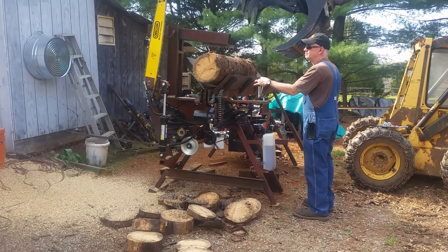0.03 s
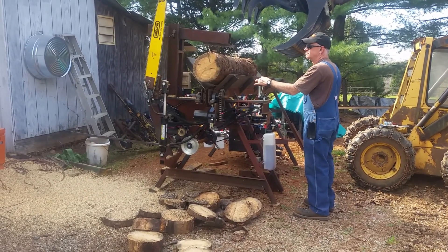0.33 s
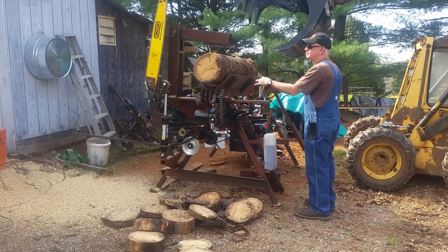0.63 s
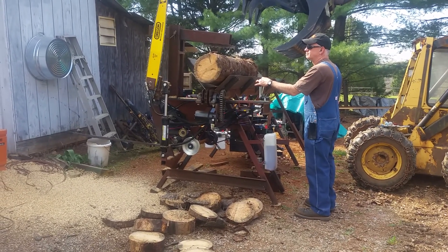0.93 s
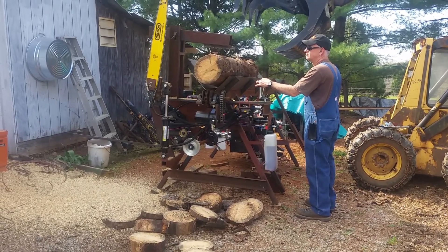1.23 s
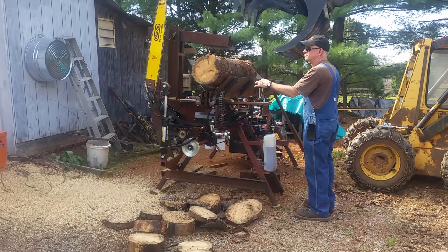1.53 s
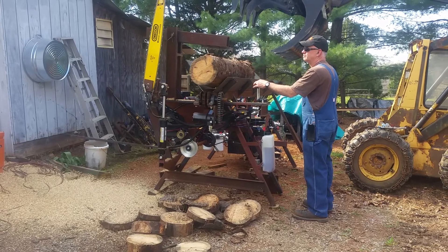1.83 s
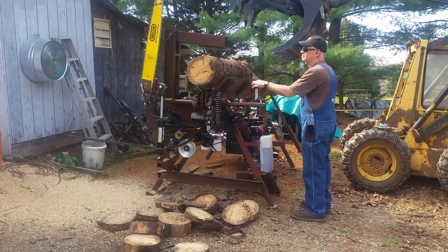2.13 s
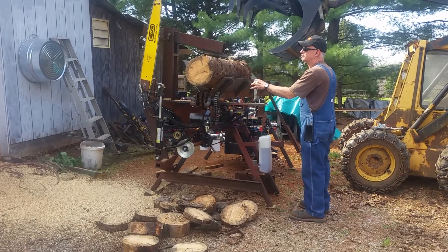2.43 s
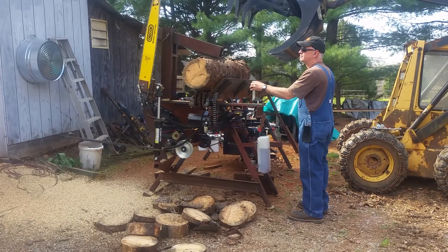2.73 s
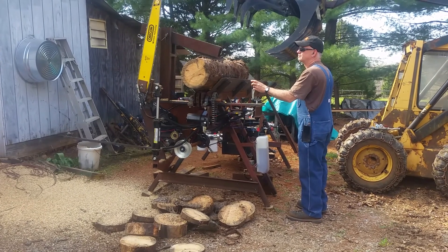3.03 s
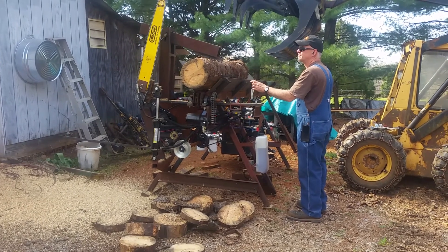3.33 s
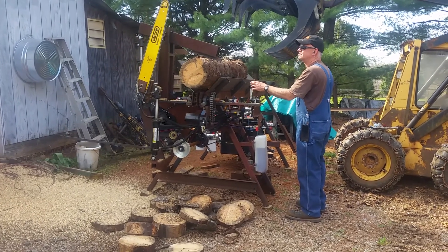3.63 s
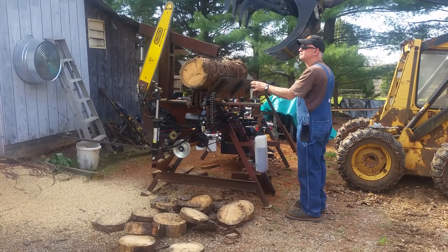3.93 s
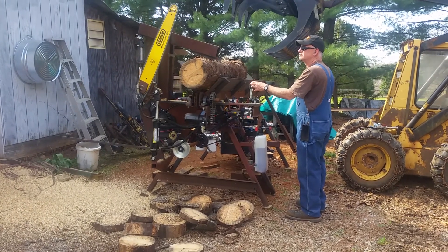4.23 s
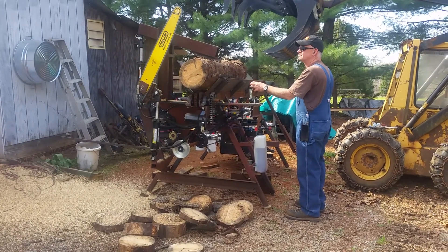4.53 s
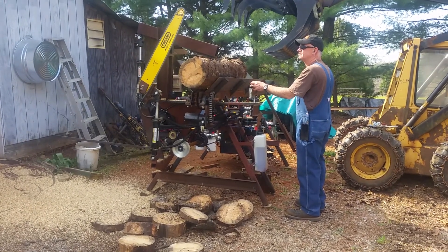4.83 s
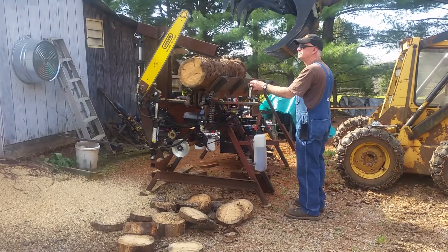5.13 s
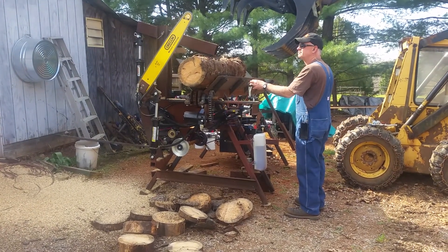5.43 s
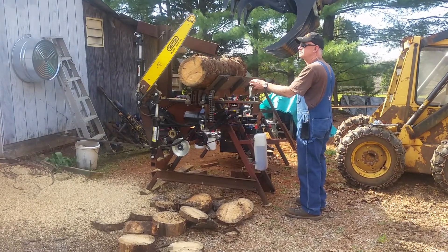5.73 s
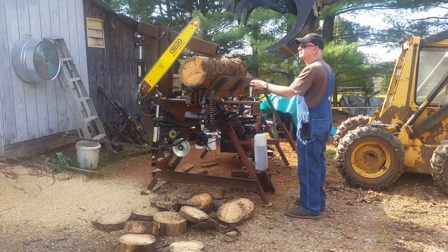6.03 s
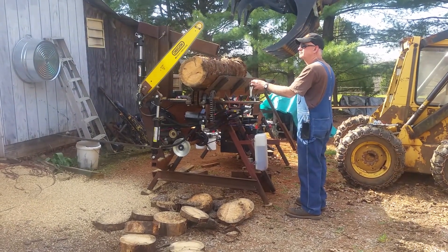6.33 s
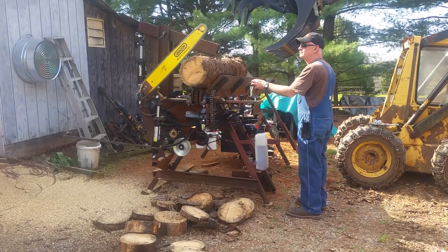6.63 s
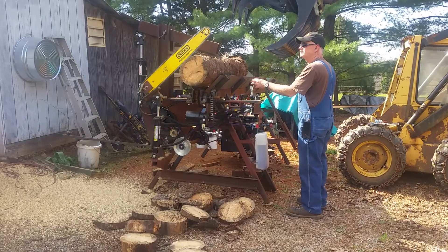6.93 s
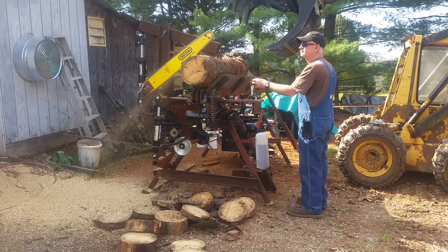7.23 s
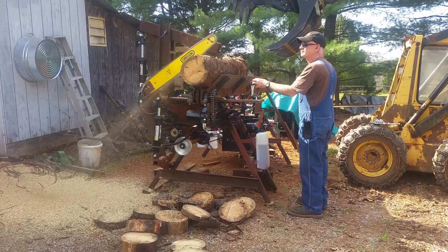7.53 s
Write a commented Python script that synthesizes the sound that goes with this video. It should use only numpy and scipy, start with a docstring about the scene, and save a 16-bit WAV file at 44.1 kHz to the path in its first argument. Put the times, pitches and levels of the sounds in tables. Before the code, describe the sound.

A petrol firewood processor runs loudly at full throttle in a yard, a few metres away. From the start its exhaust throbs fast and evenly under valve clatter, a rattling steel guard, gear and pump whine and hissing oil, while a faint ring of steel dies away. At about 2.5 seconds the log carriage scrapes briefly. From 3.1 seconds a hydraulic valve whistles and the pump gives a short straining tone. At 3.7 seconds the saw chain starts with a spurt of oil; the engine bogs, stumbles with a low boom and regains speed by about 4.6 seconds. The roar and whine are now quieter, and the chain's bright hiss takes over. Between 4.4 and 6.2 seconds the descending saw arm gives three faint, rasping squeals. From about 7.2 seconds the engine throb grows slightly as the teeth begin biting the log.

```python
"""A yard: a petrol firewood processor at full throttle, a few metres away.
Firings throb in the exhaust, valve gear clatters, gears, fan and hydraulic pump whine, oil hisses in
the valves. The steel frame rings out and the log carriage scrapes. The saw chain is switched in and
its arm swings down, squealing: the engine bogs, the governor catches it, and the chain's bright hiss
takes over until the teeth begin to bite."""
import sys
import numpy as np
from scipy.fft import rfft, irfft
from scipy.io import wavfile
from scipy.ndimage import uniform_filter1d

SR = 44100
rng = np.random.default_rng(int(sys.argv[2]) if len(sys.argv) > 2 else 0)


def log_audio(samples):
    """Write samples as a 16-bit WAV file to the path given in sys.argv[1]."""
    # one column per channel
    frames = np.atleast_2d(samples).T
    # limit to full scale, then quantise
    limited = np.clip(frames, -1, 1)
    pcm = np.round(limited * 32767).astype(np.int16)
    wavfile.write(sys.argv[1], SR, pcm)


N = 334278
TIME_S = np.arange(N) / SR
FREQ_HZ = np.maximum(np.arange(N // 2 + 1) * SR / N, 1)

# engine speed, with sag and governor recovery (time [s], crank rate [Hz])
CRANK_SPEED = [(0.0, 56.8), (0.08, 56.81), (3.0, 56.65), (3.17, 56.17), (3.31, 56.19), (3.71, 56.64),
               (3.76, 55.77), (3.88, 48.05), (4.2, 53.18), (4.58, 56.93), (4.71, 57.14), (5.13, 55.47),
               (5.83, 56.5), (6.36, 55.73), (6.63, 56.06), (6.99, 56.03), (7.41, 55), (7.58, 55.4)]
# exhaust partials, relative (order [x crank rate], free [dB], bogged [dB], driving the chain [dB])
EXHAUST_ORDERS = [(0.5, -37, -36, -36.0), (1.0, -17.5, -5, -17), (1.5, -17, -30, -46), (2.0, 2.5, 5.5, 2),
                  (2.5, -57, -13, -17), (3.0, -2, -14, -5.5), (3.5, -23, -14, -33), (4.0, -8.5, -5.5, -8),
                  (4.5, -34, -19, -25), (5.0, -17.5, -15, -18.5), (6.0, -22.5, -7.5, -22),
                  (6.5, -17, -34, -23.5), (7.0, -20.5, -21, -27), (7.5, -20, -24, -39),
                  (8.0, -36, -22, -23), (8.5, -17, -33, -21), (9.0, -20.5, -23, -23), (10.0, -24, -21, -21)]
# roar and hiss spectra, relative (frequency [Hz], left [dB], right [dB])
ROAR_FREE_SPECTRUM = [(35, -67.5, -68.8), (65, -62.7, -64.7), (115, -57.2, -58.3), (250, -57.7, -58.9),
                      (550, -58.0, -58.3), (660, -62.3, -62.7), (790, -57.1, -66.4), (970, -56.7, -60.1),
                      (1400, -57.7, -58.6), (1950, -60.4, -60.9), (2300, -57.8, -58.3),
                      (2530, -57.2, -57.4), (2750, -59.6, -59.1), (3000, -61.6, -59.2)]
ROAR_LOADED_SPECTRUM = [(35, -71.6, -72.8), (65, -66.1, -69.0), (115, -61.9, -65.0), (250, -64.2, -68.1),
                        (530, -63.9, -67.3), (630, -69.1, -69.5), (720, -68.6, -70.5), (800, -63.6, -73.1),
                        (970, -62.0, -66.1), (1400, -64.6, -67.3), (2000, -67.3, -67.2),
                        (2500, -63.0, -63.3), (2750, -64.2, -63.9), (3000, -65.3, -62.8)]
OIL_SPECTRUM = [(3425, -67, -52.5), (3790, -61, -60), (4640, -80, -58), (5320, -67.5, -57),
                (5670, -62, -64.5), (6420, -64.5, -62), (7510, -49, -67), (8030, -53.5, -85),
                (9140, -55, -66), (10540, -51.5, -66.5), (11940, -55, -61), (13500, -59.5, -65),
                (14300, -69, -74)]
CHAIN_SPECTRUM = [(3320, -68, -57), (3980, -61, -59.5), (4570, -86, -60), (5230, -69.5, -58.5),
                  (6080, -68.5, -67), (7120, -56, -69.5), (7720, -51, -66), (8900, -56.5, -75),
                  (9550, -55.5, -63), (10360, -50, -76), (11000, -47.5, -59), (12340, -49.5, -63),
                  (13100, -57, -63.5), (14300, -59.5, -62.5)]
# left-right likeness of roar and hiss (frequency [Hz], correlation [0-1])
STEREO_CORRELATION = [(120, 0.43), (500, 0.64), (780, 0.29), (1100, 0.13), (1500, 0.05), (2000, 0),
                      (2400, 0.73), (2900, 0), (4000, 0)]
# gear tones, relative (order [x crank rate], free [dB], loaded [dB], left minus right [dB])
GEAR_ORDERS = [(19.06, -13.5, -29, -1), (21.56, -25, -37, 0), (29.78, -14.5, -15, -2),
               (62.3, -16.5, -37, -2), (87.1, -23, -36, -6), (97, -17, -36, -12)]
# frame and oil-flow resonances (frequency [Hz], width [Hz], level [dB], left minus right [dB])
FRAME_MODES = [(2525, 22, -35, 0), (3140, 19, -37, -7), (3780, 21, -34, -6), (4650, 21, -37.5, -11),
               (4800, 2500, -29.5, -5)]
WHISTLE_MODES = [(2420, 150, -42, 1), (5050, 130, -42, -12), (8760, 80, -37, 8), (9340, 60, -43, 12),
                 (10450, 300, -33, 12)]
SPURT_MODES = [(4200, 2000, -33.5, -3), (7400, 400, -30, 17)]
# frame resonances under the carriage (frequency [Hz], width [Hz], level [dB])
CARRIAGE_MODES = [(440, 36, -29.5), (990, 110, -28), (1450, 550, -30), (2700, 680, -27)]
# uneven firings (centre time [s], length [s], frequency [Hz], level [dB])
UNEVEN_FIRINGS = [(3.835, 0.063, 212, -27), (3.937, 0.15, 146.4, -23), (6.224, 0.046, 82, -25)]
# saw arm squeals (start [s], end [s], pitch [Hz], level [dB])
SQUEALS = [(4.449, 4.852, 1710, -47), (4.867, 5.396, 1675, -43), (5.68, 6.201, 1687, -42)]
# squeal partials and rasp (multiple [x pitch], width [Hz], relative level [dB])
SQUEAL_MODES = [(2, 130, 2.5), (3, 100, -6), (3.6, 2500, 2)]

# layer gains (free [dB], change under load [dB], drift with chain on [dB/s], change at bite [dB])
EXHAUST_LEVEL = (-16.8, -9.5, -0.75, 3)
ENGINE_LEVEL = (-25.5, -5, -0.62, 2)
FAN_LEVEL = (-33.5, -13.5, -0.5, -7)
PUMP_LEVEL = (-35.5, -10, -1, -7)
HISS_LEVEL = (-22.5, 2.5, -0.49, 1)

LEVER_S, PUSH_S, PUSH_RISE_S, PUSH_LOAD = 2.54, 3.08, 0.12, 0.48  # swing valve opens, pump pushes arm
PUSH_EXHAUST_DB, PUSH_ENGINE_DB, PUSH_FAN_DB = -0.3, 0.55, -0.5
SAW_ON_S, SAW_RISE_S = 3.734, 0.13
BITE_S, BITE_RISE_S = 7.16, 0.4
GOVERNED_HZ, FULL_SAG_HZ = 55.6, 6.7
THROTTLE_DB_PER_HZ_PER_S, GOVERNOR_S, COAST_HZ_PER_S = 0.34, 0.11, 6


def undb(db):
    """Decibels to gain."""
    return 10 ** (np.asarray(db) / 20)


def pan(db):
    """Stereo gains for a left-minus-right level."""
    return undb(np.array([[db], [-db]]) / 2)


def ramp(start_s, length_s):
    """Linear rise, 0 to 1."""
    return np.clip((TIME_S - start_s) / length_s, 0, 1)


def swell(start_s, end_s):
    """Rounded rise and fall."""
    return np.sqrt(np.abs(np.sin(np.pi * ramp(start_s, end_s - start_s))))


def layer_gain(level, load):
    """Gain as the chain starts, runs and bites."""
    free_db, load_db, drift_db_per_s, bite_db = level
    running_s = np.maximum(TIME_S - SAW_ON_S, 0)
    bite = ramp(BITE_S, BITE_RISE_S)
    return undb(free_db + load_db * load + drift_db_per_s * running_s + bite_db * bite)


def wander(rate_hz):
    """Low-passed noise, rms 1."""
    x = irfft(rfft(rng.standard_normal(N)) * np.exp(-(FREQ_HZ / rate_hz) ** 2), N)
    return x / x.std()


def ring(hz, width_hz):
    """Resonance driven by friction or flow noise, rms 1."""
    x = irfft(rfft(rng.standard_normal(N)) / (1 + 1j * (FREQ_HZ - hz) / width_hz) ** 2, N)
    return x / x.std()


def resonances(modes):
    """Sum of panned resonances."""
    return sum(pan(pan_db) * undb(db) * ring(hz, width_hz) for hz, width_hz, db, pan_db in modes)


def over_freq(hz, values):
    """Interpolation on log frequency."""
    return np.interp(np.log(FREQ_HZ), np.log(hz), values)


def stereo_spectra(three_noises):
    """Left and right spectra from one shared and two separate noises."""
    shared, *own = rfft(three_noises)
    correlation = np.clip(over_freq(*np.transpose(STEREO_CORRELATION)), 0, 1)
    return np.sqrt(correlation) * shared + np.sqrt(1 - correlation) * np.array(own)


def colour(spectra, table, band_hz):
    """Stereo noise shaped by a table, steep skirts; mid signal has rms 1 in the band."""
    hz, *sides_db = np.transpose(table)
    skirts = 1 / np.sqrt((1 + (hz[0] / FREQ_HZ) ** 20) * (1 + (FREQ_HZ / (0.99 * hz[-1])) ** 20))
    shaped = spectra * skirts * undb([over_freq(hz, db) for db in sides_db])
    in_band = (FREQ_HZ > band_hz[0]) & (FREQ_HZ < band_hz[1])
    return irfft(shaped, N) / irfft(shaped.mean(0) * in_band, N).std()


def exhaust(turns, load, bog, smear_rad=0.298):
    """One puff a turn, alternate ones unlike; the pipe smears upper partials in time."""
    wave = 0
    for order, free_db, bogged_db, loaded_db in EXHAUST_ORDERS:
        db = (1 - bog) * (free_db + (loaded_db - free_db) * load) + bog * bogged_db
        wave = wave + undb(db) * np.sin(2 * np.pi * order * turns + smear_rad * (order - 3) ** 2)
    wave = wave / np.sqrt(uniform_filter1d(wave ** 2, size=6000))
    return wave * undb((-0.88 + 0.85 * load) * wander(29))  # no two firings burn alike


def throttle_db(crank_hz, bog):
    """Governor throttle: exhaust level follows crank acceleration, less so when bogged."""
    accel_hz_per_s = np.maximum(np.gradient(crank_hz) * SR, -COAST_HZ_PER_S)
    smoothed = uniform_filter1d(accel_hz_per_s, int(GOVERNOR_S * SR))
    return THROTTLE_DB_PER_HZ_PER_S * smoothed * (1 - bog) ** 2


def roar(turns, load, crossover_hz=700, band_hz=(400, 2800)):
    """Valve gear clatter, partly repeating every two turns, over fan noise and a gas gush per firing."""
    points = 1556
    cycles = rng.standard_normal((3, points))
    clatter = np.array([np.interp(turns / 2 * points, np.arange(points), c, period=points)
                        for c in cycles])
    repeat_share = 0.29 * (1 - 0.61 * load)
    metal = np.sqrt(repeat_share) * clatter + np.sqrt(1 - repeat_share) * rng.standard_normal((3, N))
    gas = rng.standard_normal((3, N)) * (1 + 0.34 * np.cos(2 * np.pi * turns))
    low_share = 1 / (1 + (FREQ_HZ / crossover_hz) ** 6)
    noises = irfft(np.sqrt(low_share) * rfft(gas) + np.sqrt(1 - low_share) * rfft(metal), N)
    spectra = stereo_spectra(noises)
    free = colour(spectra, ROAR_FREE_SPECTRUM, band_hz)
    loaded = colour(spectra, ROAR_LOADED_SPECTRUM, band_hz)
    return (1 - load) * free + load * loaded


def gear_whine(turns, load):
    """Gear teeth sing at crank orders, wavering in moving air."""
    out = 0
    for order, free_db, loaded_db, pan_db in GEAR_ORDERS:
        phase = 2 * np.pi * order * turns + (0.14 + 1.3 * load) * wander(7.7)
        db = free_db + (loaded_db - free_db) * load + 0.87 * wander(4.6)
        out = out + pan(pan_db) * undb(db) * np.sin(phase)
    return out


def guard_rattle(turns, load, hz=2480, width_hz=190, uneven_db=3.0):
    """A loose steel guard, shaken by the engine, chatters in uneven bursts."""
    shake = (1 + 0.12 * np.cos(2 * np.pi * turns)) * undb(uneven_db * wander(21))
    return undb(-13 - load) * ring(hz, width_hz) * shake / np.sqrt(np.mean(shake ** 2))


def fan(turns, load, push, blades=12):
    """Tone of blades passing their housing."""
    gain = layer_gain(FAN_LEVEL, load) * undb(PUSH_FAN_DB * push + 0.69 * wander(3.2))
    return gain * np.sin(2 * np.pi * blades * turns + (0.3 + 0.78 * push) * wander(24))


def pump(turns, load, tooth_order=23.37, relief_db=-5):
    """Pump teeth sing: softer once oil flows to the swing cylinder, less steady under load."""
    relief = ramp(LEVER_S, 0.1) * (1 - load)
    gain = layer_gain(PUMP_LEVEL, load) * undb(relief_db * relief + 0.98 * wander(6.1))
    return gain * np.sin(2 * np.pi * tooth_order * turns + (0.26 + 0.97 * load) * wander(10.5))


def hiss(turns, load, band_hz=(7000, 14000)):
    """Oil jets through valves, rippling with the engine; the brighter chain takes over under load."""
    ripple = 1 + 0.025 * np.cos(np.pi * turns) + 0.034 * np.cos(4 * np.pi * turns)
    noises = rng.standard_normal((3, N)) * ripple
    flicker_db = 0.52 * wander(29) + 0.5 * wander(500)
    spectra = stereo_spectra(noises * undb(flicker_db))
    oil = colour(spectra, OIL_SPECTRUM, band_hz)
    chain = colour(spectra, CHAIN_SPECTRUM, band_hz)
    return layer_gain(HISS_LEVEL, load) * ((1 - load) * oil + load * chain)


def frame_ring(t60_s=3.6):
    """The steel frame still rings from the last stroke."""
    return undb(-60 * TIME_S / t60_s) * resonances(FRAME_MODES)


def carriage_scrape(centre_s=2.555, length_s=0.078):
    """The log carriage rubs on steel; the frame rings."""
    rub = swell(centre_s - length_s / 2, centre_s + length_s / 2) ** 2
    return pan(-2.2) * rub * sum(undb(db) * ring(hz, width_hz) for hz, width_hz, db in CARRIAGE_MODES)


def valve_whistle():
    """Oil whistles in the swing valve until the saw takes the flow."""
    return swell(PUSH_S, SAW_ON_S + SAW_RISE_S / 2) * resonances(WHISTLE_MODES)


def pump_strain(start_s=3.12, end_s=3.45, hz=1358, db=-30.5):
    """Brief tone of the pump straining against the arm."""
    return undb(db) * swell(start_s, end_s) * np.sin(2 * np.pi * hz * TIME_S + 0.68 * wander(25))


def oil_spurt(length_s=0.15):
    """Oil spurts into the saw motor as its valve opens."""
    return swell(SAW_ON_S, SAW_ON_S + length_s) * resonances(SPURT_MODES)


def stumbles():
    """Uneven firings boom in the muffler."""
    out = 0
    for centre_s, length_s, hz, db in UNEVEN_FIRINGS:
        envelope = swell(centre_s - length_s / 2, centre_s + length_s / 2) ** 4
        out = out + undb(db) * envelope * np.sin(2 * np.pi * hz * TIME_S)
    return out


def arm_squeal():
    """The saw arm squeals and rasps faintly on its way down."""
    return pan(-7) * sum(undb(db + partial_db) * swell(start_s, end_s) * ring(multiple * hz, width_hz)
                         for start_s, end_s, hz, db in SQUEALS
                         for multiple, width_hz, partial_db in SQUEAL_MODES)


def scene():
    """The crank paces the running layers; the arm loads it lightly, then the saw fully."""
    crank_hz = np.interp(TIME_S, *np.transpose(CRANK_SPEED))
    turns = np.cumsum(crank_hz) / SR
    load = ramp(SAW_ON_S, SAW_RISE_S)
    push = ramp(PUSH_S, PUSH_RISE_S) * (1 - load)
    bog = np.clip((GOVERNED_HZ - crank_hz) / FULL_SAG_HZ, 0, 1)
    effort_db = throttle_db(crank_hz, bog) + PUSH_EXHAUST_DB * push
    puffs = exhaust(turns + 0.0033 * wander(45), load + PUSH_LOAD * push, bog)
    pipe = pan(0.8) * (layer_gain(EXHAUST_LEVEL, load) * undb(effort_db) * puffs + stumbles())
    clatter = undb(-2) * roar(turns, load) + gear_whine(turns, load) + guard_rattle(turns, load)
    engine = layer_gain(ENGINE_LEVEL, load) * undb(PUSH_ENGINE_DB * push) * clatter
    tones = pan(1.1) * (fan(turns, load, push) + pump(turns, load))
    hydraulics = hiss(turns, load) + valve_whistle() + pump_strain() + oil_spurt()
    return pipe + engine + tones + hydraulics + frame_ring() + arm_squeal() + carriage_scrape()


def record(dry, ceiling=0.92, cutoff_hz=14460):
    """Soft peak limit, then a steep low-pass."""
    rounded = dry / (1 + (dry / ceiling) ** 8) ** (1 / 8)
    return irfft(rfft(rounded) / np.sqrt(1 + np.minimum(FREQ_HZ / cutoff_hz, 1.2) ** 700), N)


dry = scene()
out = record(dry)
log_audio(out)
```